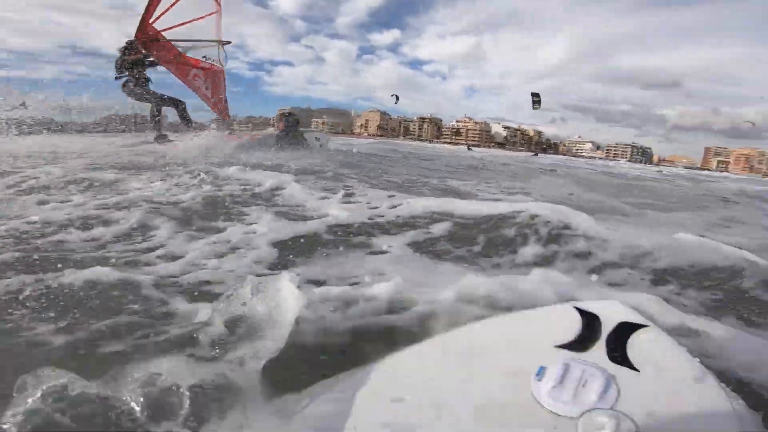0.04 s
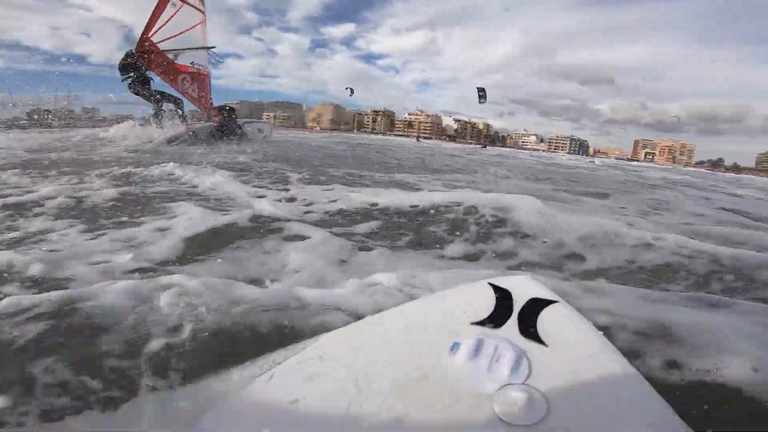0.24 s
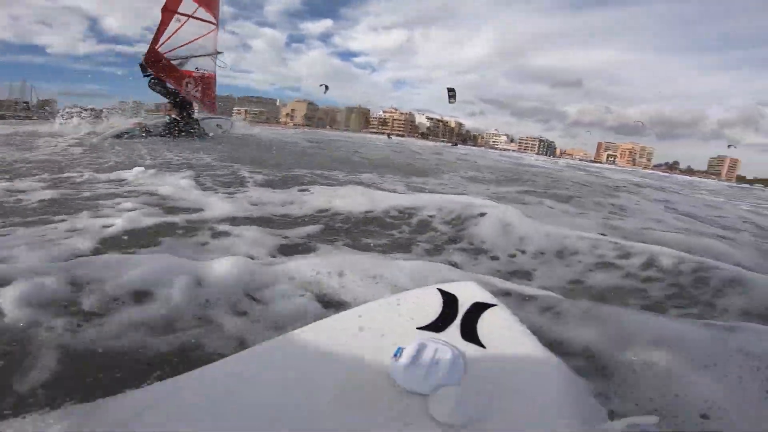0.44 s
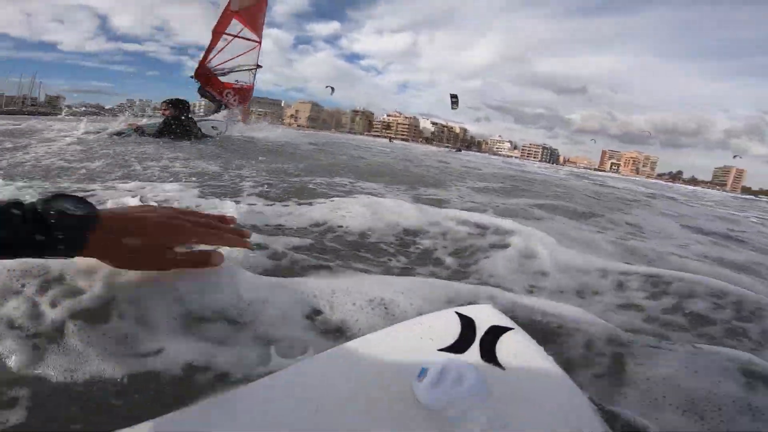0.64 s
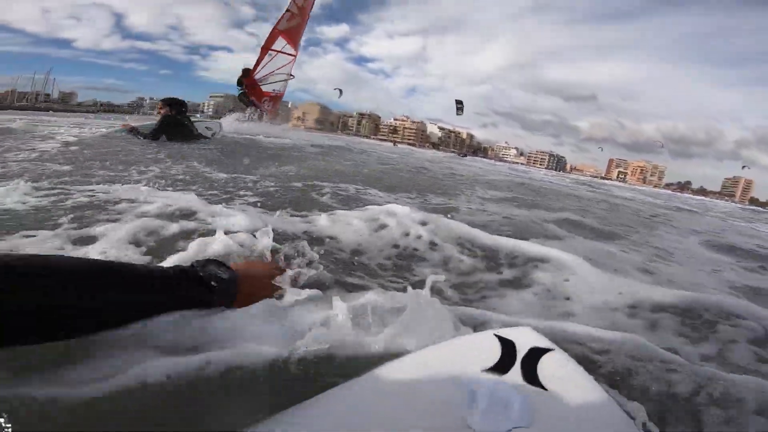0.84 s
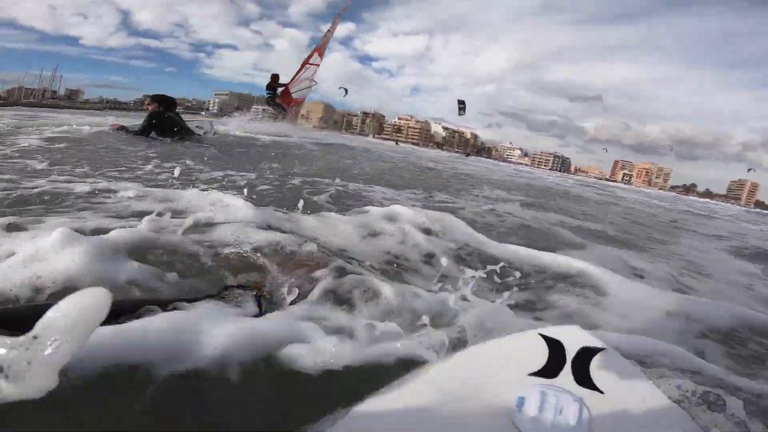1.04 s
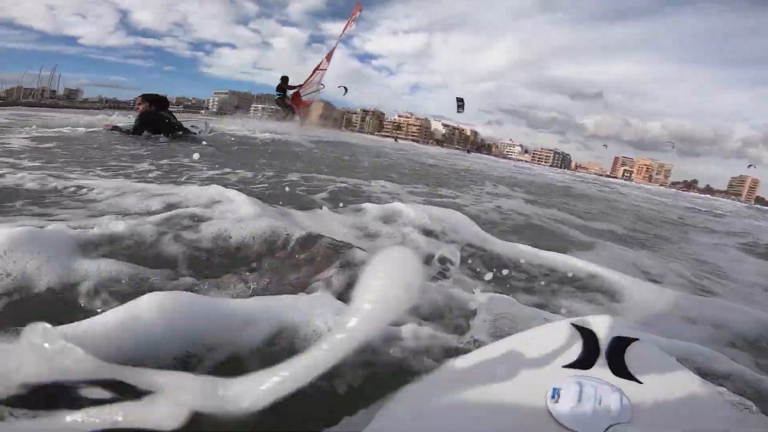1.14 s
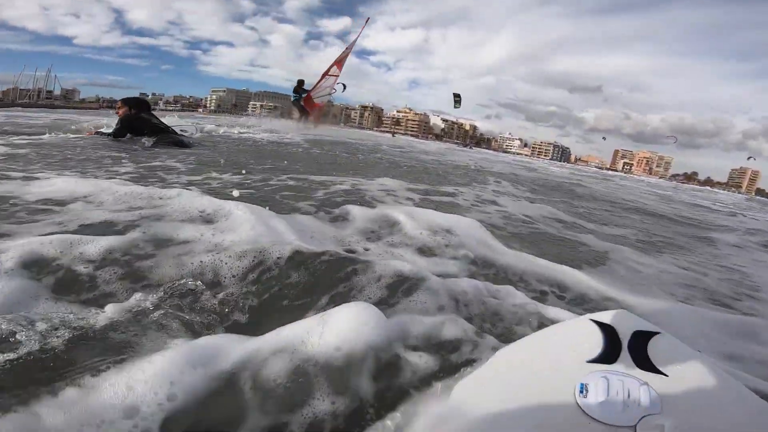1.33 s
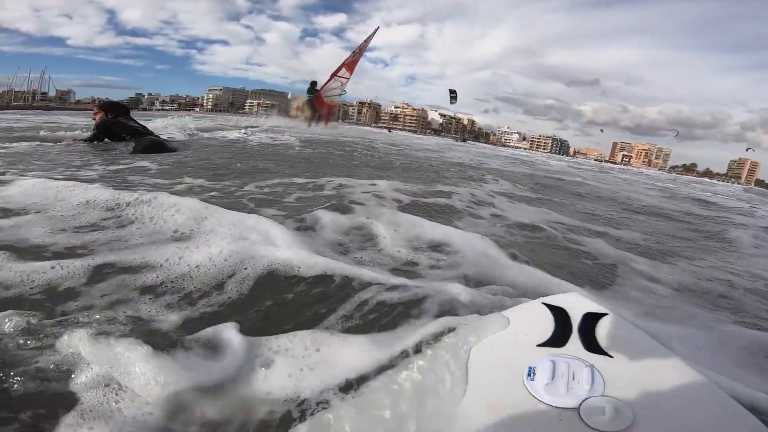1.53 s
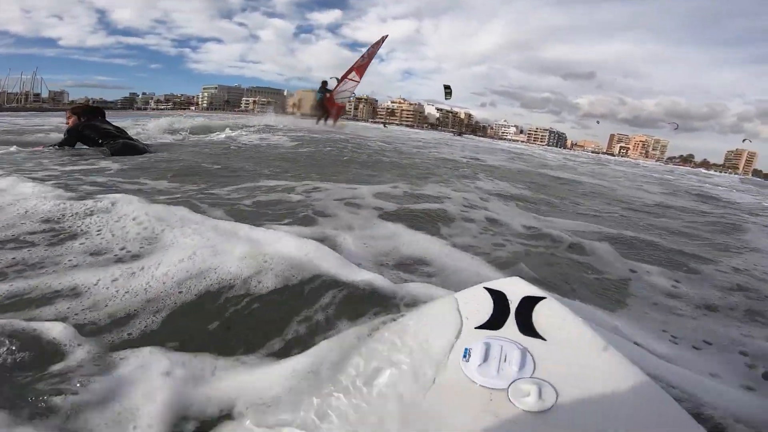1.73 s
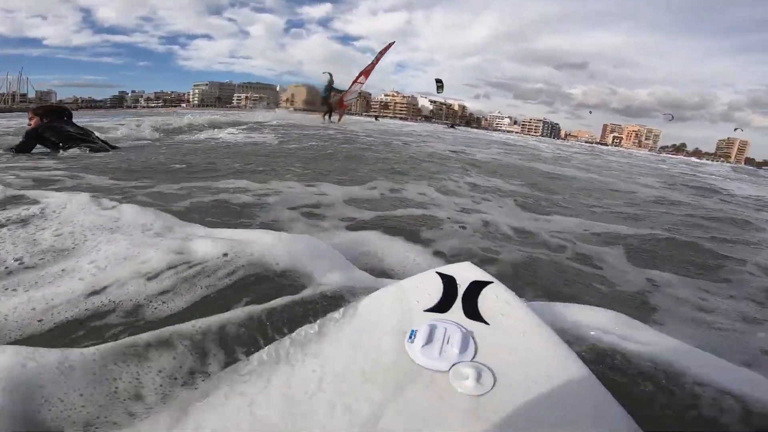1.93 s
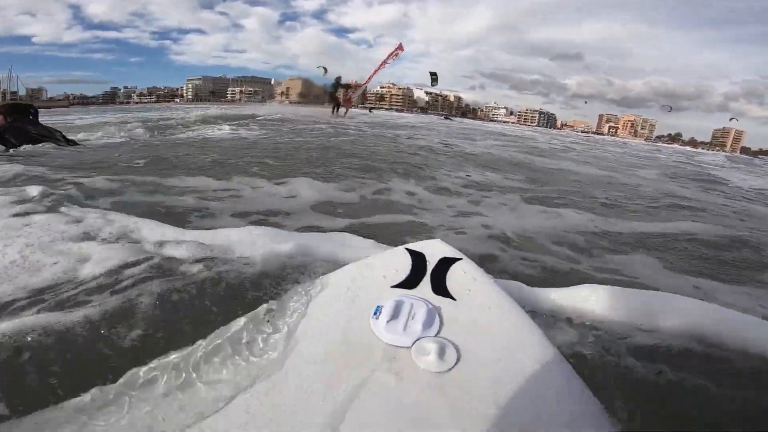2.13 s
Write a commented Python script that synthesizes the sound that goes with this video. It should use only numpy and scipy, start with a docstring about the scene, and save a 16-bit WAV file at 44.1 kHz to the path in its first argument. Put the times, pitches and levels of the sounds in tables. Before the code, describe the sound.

Whitewater slaps and churns around a surfboard, muffled, over low wind buffeting.

```python
"""Whitewater sloshes and foams around a surfboard, heard through a small camera's wet, muffled case.
In the first second, gulps (trapped bubbles in spray) slap the case and ring it, flat hits thump it
and drops tick on the microphone port. The foam of a breaking wave fades early and rushes back
near the end. Wind and swell push low on the microphone throughout."""
import sys
import numpy as np
from scipy import signal
from scipy.fft import rfft, irfft
from scipy.io import wavfile
from scipy.ndimage import uniform_filter1d

SR = 44100
rng = np.random.default_rng(int(sys.argv[2]) if len(sys.argv) > 2 else 0)


def inscribe(sig):
    """Save sig as 16-bit PCM at rate SR to the path in sys.argv[1].

    A 1-D sig is mono; a 2-D sig holds one channel per row.
    Samples are clipped to [-1, 1] before scaling.
    """
    pcm = np.round(np.clip(np.atleast_2d(sig).T, -1, 1) * 32767)
    wavfile.write(sys.argv[1], SR, pcm.astype(np.int16))


N = 95961

# Wind and swell pressure: (time [s], level [dB], upper rumble lift [dB])
WIND_LEVELS = [(0.0, -33, 14.5), (0.05, -22, -0.5), (0.13, -28, -2), (0.17, -23, 5.5), (0.5, -30.5, -2.5),
               (0.54, -20, -8.5), (0.69, -26.5, 5), (0.8, -20, 3.5), (0.92, -30, 6.5), (1.07, -25, 2.5),
               (1.13, -34.5, 11), (1.37, -21.5, -1.5), (1.7, -28.5, 3.5), (1.75, -24.5, 6.5),
               (1.78, -23.5, 5.5), (1.83, -20, 1), (2.13, -24.5, 9), (2.17, -16.5, -8)]
# (frequency [Hz], relative density [dB])
WIND_SPECTRUM = [(1.8, -45), (3.0, 0.5), (18, 1.5), (28, -2), (42, -10.5), (64, -11.5), (281, -30),
                 (350, -30.5), (460, -44.5), (770, -120)]
# Foam of a breaking wave: (time [s], level [dB])
FOAM_LEVELS = [(0, -31), (.06, -33.5), (.2, -31.5), (.26, -42), (.3, -42.5), (.42, -51.5), (.46, -56),
               (1.55, -55.5), (1.63, -42.5), (1.69, -34.5), (1.78, -28), (1.9, -25), (2.0, -23.5),
               (2.1, -26), (2.18, -26)]
# (frequency [Hz], relative density [dB])
FOAM_SPECTRUM = [(120, -47), (200, -34.5), (304, -20.5), (463, -12), (574, -7.5), (636, -10.5), (740, -4),
                 (830, -7), (1250, -17), (1470, -16.5), (1610, -16), (1740, -23.5), (2150, -24),
                 (2480, -11.5), (2700, -18.5), (2900, -21), (3380, -36.5), (3600, -27), (4170, -34.5),
                 (4700, -40.5), (5300, -39), (6100, -44), (7000, -51), (8000, -73), (8800, -76.5)]
# Churn at the board: (time [s], level [dB], treble lift [dB])
SLOSH_LEVELS = [(0, -35.5, 6.5), (.07, -23.5, 5), (.2, -28, 7.5), (.255, -24.5, 4.5), (.275, -35, 7),
                (.34, -35, 7.5), (.39, -29.5, -2), (.43, -47, 11), (.48, -44.5, 6.5), (.55, -40.5, 3.5),
                (.614, -33, 3.5), (.72, -30, -0.5), (.86, -31, 4), (.91, -31.5, 5), (1.0, -33.5, 2),
                (1.15, -38, 3.5), (1.32, -35, 0.5), (1.48, -39, 6), (1.56, -43, 3.5), (1.7, -41.5, 0)]
# (frequency [Hz], relative density [dB])
SLOSH_SPECTRUM = [(120, -18), (200, -7), (297, -18), (457, -5), (652, -1.5), (769, 4), (931, -0.5),
                  (1000, -7), (1095, 2), (1200, -5), (1450, -9), (1590, -7.5), (1800, -10.5), (2240, -22),
                  (2450, -14.5), (2710, -25), (3230, -31), (3600, -32.5), (3900, -31.5), (4600, -42),
                  (5300, -38), (5700, -48), (6600, -48), (7500, -70), (8800, -93)]
# Drops on the port: (time [s], level [dB])
TICK_HITS = [(0.212, -41), (0.222, -41), (0.2325, -42.5), (.322, -39.5), (0.375, -54), (.388, -42),
             (0.3921, -34.5), (.701, -47)]
# (frequency [Hz], relative density [dB])
TICK_SPECTRUM = [(1500, -25.5), (2800, 4), (4500, 2.5), (6000, -5), (8000, -19.5), (8800, -30.5)]
# Flat hits on the case: (time [s], push [dB], push pitch [Hz], knock [dB])
THUMP_HITS = [(0.31, -12, 87, -15), (.392, -11.5, 88, -18.5), (.563, -20, 110, -27.5)]
# Gulps: (peak time [s], bubble peak [dB], pitch [Hz], Gaussian width [s], spray [dB])
GULP_HITS = [(.072, -19, 1818, 0.0024, -45), (0.0744, -11.5, 954, 0.00097, -30.5),
             (.102, -19.5, 654, 0.0011, -26.5), (.14, -21.5, 900, 0.0035, -27),
             (.171, -11, 1057, 0.0015, -22), (.211, -33, 1740, 0.001, -27.5),
             (0.222, -31.5, 1786, 0.00067, -23.5), (.2335, -17.5, 1730, 0.0028, -22),
             (0.2529, -11.5, 1830, 0.0015, -16.5), (.258, -17.5, 973, 0.00085, -29),
             (0.305, -24.5, 1872, 0.0024, -25), (0.324, -37, 2967, 0.0021, -29),
             (0.35, -20.5, 1000, 0.0015, -39.5), (.359, -18.5, 1028, 0.002, -46),
             (.367, -19, 939, 0.00048, -37), (0.371, -12.5, 952, 0.00098, -27.5),
             (.377, -14.5, 844, 0.0029, -31), (0.381, -15, 1038, 0.0013, -31),
             (.388, -9.5, 1050, .0015, -22), (.392, -8.5, 1227, .001, -16), (.395, -9.5, 802, 0.0018, -25),
             (.568, -26.5, 750, 0.0033, -47.5), (.655, -31, 1714, .003, -37.5),
             (.678, -31, 1726, 0.0049, -38.5), (0.702, -29.5, 1000, 0.00057, -30),
             (0.717, -28, 1000, .003, -34), (.815, -28, 1720, .0015, -36.5), (.845, -23, 819, 0.0015, -49),
             (0.871, -23, 1054, 0.0021, -34)]
# (frequency [Hz], relative density [dB])
SPRAY_SPECTRUM = [(300, -19.5), (900, 14), (1900, -1), (2600, 1), (3300, -17), (4500, -18.5), (6000, -42),
                  (8000, -44.5), (8800, -56.5)]
# Case resonances: (frequency [Hz], relative level [dB], T60 [s])
CASE_MODES = [(473, -2, 0.059), (623, -6.5, 0.055), (818, 2, 0.079), (1099, 3.5, 0.11), (1280, -5, 0.053),
              (1805, -8.5, 0.092), (2482, -1, 0.12), (3840, -11.5, .05)]
# Stereo width: (frequency [Hz], gain [dB])
SIDE_SPECTRUM = [(30, -71), (90, -53.5), (180, -42.5), (350, -33), (700, -49), (1400, -38.5), (2800, -23.5),
                 (4500, -16), (5500, -16), (6300, 0), (8000, -7.5)]


def amp(db):
    return 10 ** (np.asarray(db) / 20)


def unit_rms(x):
    return x / np.sqrt(np.mean(x ** 2) + 1e-20)


def gain_curve(table, column=1):
    table = np.array(table)
    return amp(np.interp(np.arange(N) / SR, table[:, 0], table[:, column]))


def colour(x, spectrum):
    """Filter by a dB curve over log frequency."""
    points_hz, db = np.transpose(spectrum)
    bins_hz = np.fft.rfftfreq(len(x), 1 / SR)
    return irfft(rfft(x) * amp(np.interp(np.log(bins_hz + .5), np.log(points_hz), db)), len(x))


def noise(samples, spectrum):
    return unit_rms(colour(rng.standard_normal(samples), spectrum))


def butter(x, hz, kind):
    return signal.sosfilt(signal.butter(2, hz, kind, fs=SR, output="sos"), x)


def churn(drops_per_s, spread_db, drop_share, patchy_db, flicker_db):
    """White noise plus drops of very uneven size; the level drifts in time-frequency patches."""
    sizes = amp(spread_db * np.minimum(rng.exponential(1, N), 4))
    hits = rng.random(N) < drops_per_s / SR
    drops = unit_rms(sizes * hits * rng.choice([-1., 1.], N))
    water = drop_share * drops + (1 - drop_share) * rng.standard_normal(N)
    spectra = signal.stft(water, nperseg=256, noverlap=192)[2]
    patches = uniform_filter1d(rng.standard_normal(spectra.shape), 3, axis=0)
    patches = unit_rms(uniform_filter1d(patches, 30, axis=1))
    flicker = unit_rms(uniform_filter1d(rng.standard_normal(spectra.shape[1]), 12))
    spectra *= amp(patchy_db * patches + flicker_db * flicker)
    return signal.istft(spectra, nperseg=256, noverlap=192)[1][:N]


def wind():
    """Slow, lumpy pressure on the microphone; the upper rumble lifts in gusts."""
    push = noise(N, WIND_SPECTRUM + [(700, -87)])
    rumble = butter(push, 82, "highpass")
    return gain_curve(WIND_LEVELS) * (push + (gain_curve(WIND_LEVELS, column=2) - 1) * rumble)


def foam():
    """Dense, bright rush of bursting bubbles."""
    bursts = churn(drops_per_s=3000, spread_db=4.2, drop_share=0.39, patchy_db=1.7, flicker_db=0.64)
    return gain_curve(FOAM_LEVELS) * unit_rms(colour(bursts, FOAM_SPECTRUM))


def slosh():
    """Lumpy water at the board; the treble comes and goes."""
    water = churn(drops_per_s=2000, spread_db=4.6, drop_share=0.37, patchy_db=1.53, flicker_db=1.0)
    water = unit_rms(colour(water, SLOSH_SPECTRUM))
    treble = butter(water, 1500, "highpass")
    return gain_curve(SLOSH_LEVELS) * (water + (gain_curve(SLOSH_LEVELS, column=2) - 1) * treble)


def ticks(width_s=0.00035):
    """Single drops strike the microphone port: crisp, very short hiss."""
    out, t = np.zeros(N), np.arange(-200, 200) / SR
    for peak_s, db in TICK_HITS:
        hiss = noise(len(t), TICK_SPECTRUM)
        start = round(peak_s * SR) - 200
        out[start:start + len(t)] += amp(db) * np.exp(-.5 * (t / width_s) ** 2) * hiss
    return out


def thumps(rise_s=0.0026, knock_hz=553, knock_width_s=0.00071, cutoff_hz=1190):
    """Water hits the case flat: a short knock, then a blunt push of one or two swings."""
    out = np.zeros(N)
    for onset_s, push_db, push_hz, knock_db in THUMP_HITS:
        t = np.maximum(np.arange(N) / SR - onset_s, 0)
        push = np.sin(2 * np.pi * push_hz * t) * t / rise_s * np.exp(1 - t / rise_s)
        knock = np.sin(2 * np.pi * knock_hz * t) * np.exp(-.5 * (t / knock_width_s - 2) ** 2)
        out += amp(push_db) * push + amp(knock_db) * knock
    return butter(butter(out, cutoff_hz, "lowpass"), cutoff_hz, "lowpass")


def case_ring(slaps):
    """Slaps drive the damped modes of the case."""
    t = np.arange(6000) / SR
    modes = sum(amp(db - 60 * t / t60_s) * np.sin(2 * np.pi * hz * t) for hz, db, t60_s in CASE_MODES)
    coupling = amp(-14) * 2 / (0.0031 * SR)  # -14 dB for a 3.1 ms burst on a 0 dB mode
    return coupling * signal.oaconvolve(slaps, modes)[:N]


def gulps(wobble_depth=0.092):
    """Each gulp: a few wobbling cycles of a trapped bubble in a burst of spray."""
    out, t = np.zeros(N), np.arange(-600, 600) / SR
    for peak_s, bubble_db, hz, width_s, spray_db in GULP_HITS:
        wobble = 1 + wobble_depth * unit_rms(uniform_filter1d(rng.standard_normal(len(t)), 40))
        bubble = amp(bubble_db) * np.sin(2 * np.pi * (hz * np.cumsum(wobble) / SR + rng.random()))
        spray = amp(spray_db) * noise(len(t), SPRAY_SPECTRUM)
        start = round(peak_s * SR) - 600
        out[start:start + len(t)] += np.exp(-.5 * (t / width_s) ** 2) * (bubble + spray)
    return out


def scene():
    """Near mono; the two channels differ faintly in the treble."""
    bed = slosh() + foam() + wind()
    slaps = gulps()
    mid = bed + slaps + case_ring(slaps) + thumps() + ticks()
    scatter = rng.standard_normal(2500) * np.exp(-np.arange(2500) / 700)
    scatter /= np.linalg.norm(scatter)
    side = colour(signal.oaconvolve(mid, scatter)[:N], SIDE_SPECTRUM)
    return np.array([mid + side, mid - side])


def record(dry, cutoff_hz=8800):
    """Band limit of the camera."""
    lowpass = signal.firwin(511, cutoff_hz, window=("kaiser", 9), fs=SR)
    return signal.oaconvolve(dry, lowpass[None], "same")


dry = scene()
out = record(dry)
inscribe(out)
```